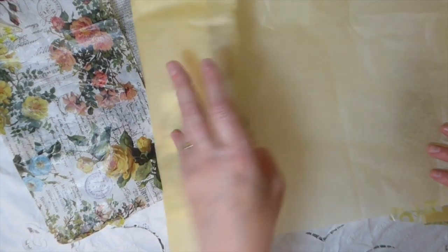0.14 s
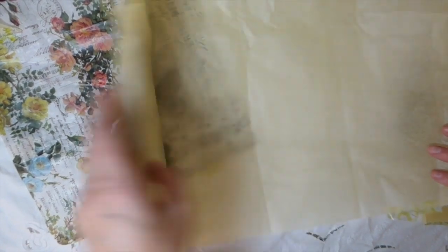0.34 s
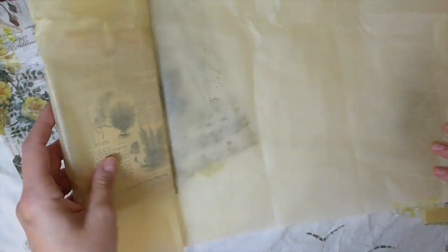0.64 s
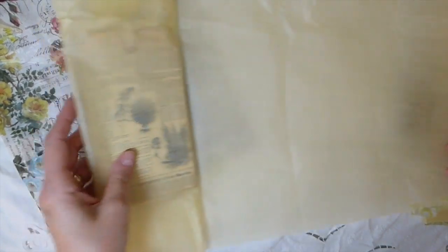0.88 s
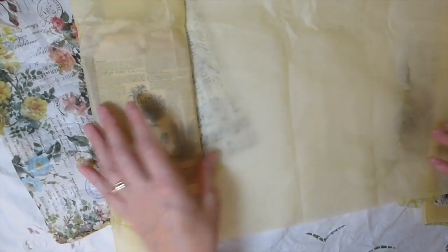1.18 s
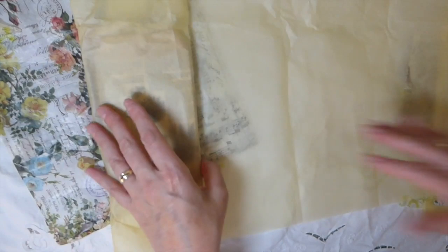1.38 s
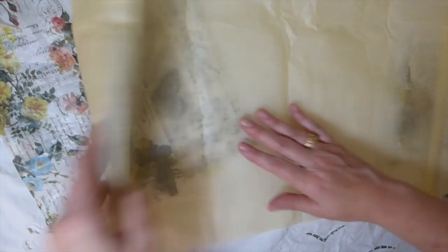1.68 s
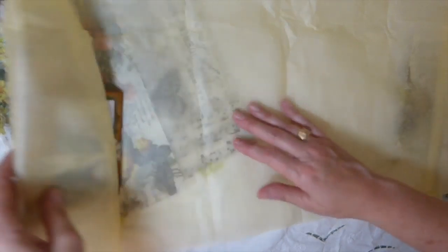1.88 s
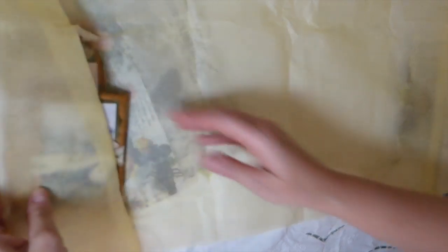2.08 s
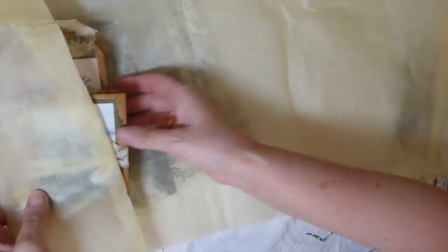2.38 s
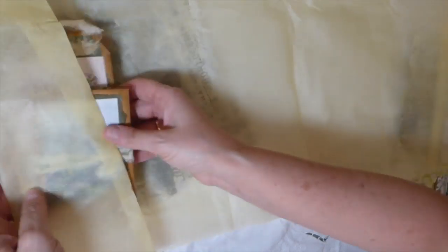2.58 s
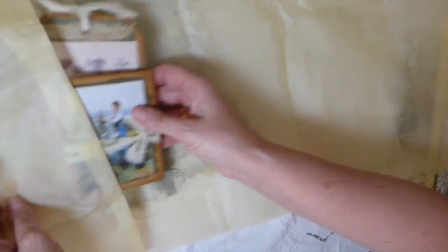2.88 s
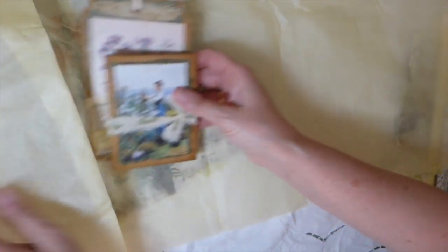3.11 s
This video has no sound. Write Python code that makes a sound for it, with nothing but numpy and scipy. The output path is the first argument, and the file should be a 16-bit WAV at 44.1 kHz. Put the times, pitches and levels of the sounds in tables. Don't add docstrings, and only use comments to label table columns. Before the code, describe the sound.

Thin tissue paper unfolds close to the microphone: separate crisp snaps first, then denser crackling as hands pull, a brief lull, and a last strong burst, in a small soft, quiet room.

```python
import sys
import numpy as np
from scipy import signal
from scipy.fft import rfft, irfft, next_fast_len
from scipy.io import wavfile
from scipy.ndimage import uniform_filter1d

SR = 44100
rng = np.random.default_rng(int(sys.argv[2]) if len(sys.argv) > 2 else 0)


def int16_out(signal):
    q = np.round(np.clip(np.atleast_2d(signal).T, -1, 1) * 32767)
    wavfile.write(sys.argv[1], SR, q.astype(np.int16))


def rack_gain(trim_db):
    fader = np.asarray(trim_db, float)
    return 10 ** (fader / 20)


N = 143325

DULL_DB = -1
LEFT_DB = 0.9
COLOUR_DB = 3.2


def unit(x):
    return x / np.sqrt(np.mean(x ** 2, axis=-1, keepdims=True) + 1e-20)


def along(points, hz):
    f, value = np.transpose(points)
    return np.interp(np.log(hz + 1), np.log(f + 1), value)


def noise(gain, shape):
    size = shape[-1]
    z = unit(irfft(rfft(rng.standard_normal(shape)) * gain, size))
    unlike = 0.22 * (1 + (np.fft.rfftfreq(size, 1 / SR) / 13000) ** 4)
    side = irfft(rfft(z[1]) * unlike, size)
    return np.array([z[0] + side, z[0] - side])


def laid(rows, s, pan_db):
    start = np.round(s * SR).astype(int)
    at = (start[:, None] + np.arange(rows.shape[-1])).ravel()
    rows = rows * rack_gain(np.array([pan_db, -pan_db]) / 2)[:, :, None]
    return np.array([np.bincount(at, r.ravel(), N + SR)[:N] for r in rows])


# start in seconds, level
# in dB, length in ms.
SNAPS_SINGLE = [(0.0428, -36, 2.5), (0.057, -30.5, 8.6), (0.083, -26, 3.5), (0.1167, -25.5, 2.5),
                (0.1574, -29, 4.8), (0.182, -26, 4), (0.1897, -41, 6), (0.2396, -28, 5.7),
                (0.266, -29.5, 8.8), (0.271, -23.5, 7.3), (0.2931, -21.5, 3.1), (0.439, -19, 6),
                (0.4554, -11.5, 1.6), (0.4958, -37, 2.5), (0.5406, -32, 1.3), (0.585, -28, 2.7),
                (0.6028, -29, 8.1), (0.646, -30, 6.3), (0.68, -24.5, 2.7), (0.6911, -21.5, 4),
                (0.7275, -32, 2.9), (0.7334, -24, 1.2), (0.7593, -30, 7.6), (0.7921, -18, 3.6),
                (0.803, -25, 5.3), (0.865, -32, 6.4), (0.8805, -47, 2.9), (0.9148, -32, 3.4),
                (0.9315, -31, 6.1), (0.9604, -30, 3.9),
                (0.978, -23.5, 4.7), (1.0081, -17.5, 3.8), (1.0635, -23.5, 7.3), (1.1358, -33, 3.2),
              (1.1434, -25, 3.2), (1.1634, -29, 6.5), (1.1828, -29.5, 5.5), (1.2148, -33.5, 3.5),
              (1.253, -39.5, 4), (1.2606, -31, 6.2), (1.2908, -37, 3.0), (1.2994, -38, 3),
              (1.319, -24.5, 5.3), (1.3507, -28.5, 17), (1.4466, -29, 5.9), (1.4598, -25, 1.9),
              (1.5052, -23, 5.2), (1.555, -21, 8), (1.6287, -21, 8.4), (1.775, -24.5, 7.7),
              (1.8472, -18.5, 3), (1.8566, -21.5, 9.5), (1.9334, -26.5, 7.7), (1.9545, -21, 3.3),
              (1.9613, -25, 2.5), (1.972, -23.5, 4.2), (1.9942, -29, 9.8), (2.038, -33, 4.9),
              (2.047, -43, 5), (2.0723, -17, 3),
                (2.0956, -29, 14), (2.1757, -32, 3.6), (2.2027, -42, 2.3), (2.2238, -27, 4.2),
               (2.247, -46, 2.1), (2.2965, -31, 4.4), (2.3054, -30.5, 11), (2.3357, -27, 20),
               (2.3582, -23, 6.9), (2.417, -23.5, 8.9), (2.441, -31, 5), (2.462, -39, 2.8),
               (2.474, -35, 5.4), (2.512, -35.5, 7.3), (2.5228, -33, 3.8), (2.5546, -28.5, 3.9),
               (2.605, -24, 2.2), (2.6112, -38, 3.7), (2.638, -29, 3.2), (2.716, -24, 3.8), (2.8, -22, 6.4),
               (2.8366, -17.5, 3.1), (2.8778, -17, 2), (2.9328, -27.5, 9.8), (2.989, -20.5, 5.4),
               (3.089, -32, 3), (3.1044, -33, 6.3), (3.1192, -18.5, 4.5), (3.1898, -34, 11),
               (3.2317, -50, 2.3)]
# start in seconds, level in dB, brightness in dB per octave.
SNAPS_BUSY = [(0.0762, -21, 1), (0.1104, -13.5, 4), (0.3476, -33, 4), (0.3565, -21, 6), (0.3662, -14.5, 8),
              (0.391, -14.5, 5), (0.5328, -21, 1), (0.573, -24.5, 0), (1.05, -14.5, -1), (1.0844, -20.5, 4),
              (1.378, -21, 4), (1.4714, -25, 4), (1.524, -23, 4), (1.5379, -18.5, 11), (1.5917, -14, 2),
              (1.6, -22, 7), (1.6555, -14, 6), (1.681, -10, 7), (1.6912, -9, 5), (1.7561, -13.5, 1),
              (1.7895, -16, 5), (1.8263, -12.5, 2.5), (1.834, -13.5, 4), (1.8751, -10, 10),
              (1.8877, -15, 12), (1.9164, -18.5, 6), (2.0106, -17, 7), (2.2728, -26, 1), (2.3935, -18, 2),
              (2.661, -34, 4), (2.6677, -24, 1), (2.7317, -11.5, 10), (2.7773, -11.5, 8.5),
              (2.8858, -8.5, 11.5), (3.0178, -18, 3), (3.046, -24, 4), (3.0501, -18.5, 4)]


def snaps():
    single = [(*row, 4.5) for row in SNAPS_SINGLE]
    busy = [(s, db - 7.5, 4.04, tilt_db) for s, db, tilt_db in SNAPS_BUSY]
    s, db, ms, tilt_db = np.transpose(single + busy)
    body_db = hands(s)[1] - 0.5
    return buckles(s, db - 9, body_db, ms, COLOUR_DB, tilt_db[:, None], size=1024)


def crackle(count):
    s = np.sort(rng.random(count)) * N / SR
    level, dull, _ = hands(s)
    size_db = 3.6 * (np.minimum(rng.exponential(size=count), 1.5) - 1)
    ms = 1.6 * np.exp(0.5 * rng.standard_normal(count))
    body_db = dull + 4.7 * rng.standard_normal(count)
    return buckles(s, level - 5 + size_db, body_db, ms, 2 * COLOUR_DB, 0, size=512)


# frequency in Hz, level in dB.
CRISP = [(300, -38), (1200, -3), (3000, 4), (16000, -4.5)]
# frequency in Hz, level in dB.
BODY = [(100, -14.5), (300, -8.5), (800, -2), (1600, -6.5), (4000, -29), (16000, -23.5)]


def buckles(s, db, body_db, ms, colour_db, tilt_db, size):
    t, hz = np.arange(size) / SR, np.fft.rfftfreq(size, 1 / SR)
    blotch = unit(uniform_filter1d(rng.standard_normal((len(s), len(hz))), size // 32, axis=1))
    gain = np.hypot(rack_gain(along(CRISP, hz)), rack_gain(along(BODY, hz) + body_db[:, None]))
    gain = gain * rack_gain(colour_db * blotch + tilt_db * np.log2(1 + hz / 4000))
    life = ms[:, None] / 1000
    rise = 1 - np.exp(-(t / 0.0005) ** 2)
    crack = rack_gain(-2) * np.exp(-(t / 0.0005) ** 2)
    burst = np.exp(-(t / life) ** 2)
    tail = rack_gain(-13) * np.exp(-t / life / 3)
    env = rise * (crack + burst + tail)
    env *= np.clip((size - np.arange(size)) / (size / 4), 0, 1)
    pan = hands(s)[2] + 4 * rng.standard_normal(len(s))
    rows = noise(gain, (2, len(s), size)) * env
    evened = np.linalg.norm(env, axis=1) / np.linalg.norm(rows.mean(0), axis=1)
    rows *= (evened * rack_gain(db))[:, None]
    return laid(rows, s, pan)


# start in seconds, peak level in dB, pitch in Hz.
POPS = [(0.059, -32.5, 1230), (0.157, -43, 1470), (0.182, -37, 1640), (0.273, -41, 1720), (0.338, -42, 894),
        (0.368, -38.5, 1210), (0.438, -23.5, 1960), (0.54, -35, 880), (0.791, -29, 860),
        (0.923, -37.5, 1230), (0.946, -31, 1340), (1.007, -34, 2130), (1.043, -29, 1340),
        (1.084, -32, 1070), (1.26, -39, 1970), (1.305, -38, 1660), (1.319, -29, 1020), (1.352, -30.5, 1190),
        (1.459, -33, 890), (1.743, -29.5, 721), (1.757, -27, 1290), (1.779, -24, 1020), (2.072, -32, 1340),
        (2.173, -41.5, 880), (2.188, -35, 1840), (2.338, -28, 765), (2.387, -27.5, 1360), (2.416, -31, 735),
        (2.474, -39, 1100), (2.511, -34.5, 910), (2.601, -30, 850), (2.647, -31.5, 920), (2.718, -37, 1390),
        (2.798, -31, 1130), (2.833, -24, 890), (2.878, -29.5, 703), (2.933, -32.5, 896),
        (2.981, -28.5, 1160), (3.018, -24.5, 1290), (3.05, -31, 1020), (3.089, -38, 1820),
        (3.119, -28.5, 1340)]
# start in seconds, peak level in dB, pitch in Hz.
FLIPS = [
    (0.369, -25.5, 4000),
    (1.007, -25, 3200),
    (1.062, -21.5, 3300),
    (1.472, -25, 1270),
    (1.504, -29, 5300),
    (1.834, -33, 2900),
    (2.665, -30, 2050),
]


def pops():
    s, db, hz = np.transpose(POPS + FLIPS)[:, :, None]
    t, f = np.arange(1024) / SR, np.fft.rfftfreq(1024, 1 / SR)
    peak = 1 / (1 + ((f / hz - hz / (f + 1)) / 0.96) ** 2)
    age = 1000 * t / 4.6
    env = 2 * age * np.exp(1 - 2 * age)
    rows = noise(peak, (2, len(s), 1024)) * env
    rows *= np.linalg.norm(env) / np.linalg.norm(rows.mean(0), axis=1, keepdims=True)
    return laid(rows * rack_gain(db - 9.5), s[:, 0], hands(s[:, 0])[2] + LEFT_DB)


def slide():
    s, hz = np.arange(N) / SR, np.fft.rfftfreq(N, 1 / SR)
    level, dull, pan = (np.interp(s, s[::32], curve) for curve in hands(s[::32]))
    skin = noise(rack_gain(along(CRISP, hz)), (2, N))
    sheet = noise(rack_gain(along(BODY, hz)), (2, N))
    hiss = skin + rack_gain(dull + DULL_DB) * sheet
    return hiss * rack_gain(level - 11 + np.array([pan, -pan]) / 2)


# centre in seconds, crackle level in dB, half width in ms, dullness in dB.
PULLS = [(0.105, -35, 16, -1.5), (0.191, -40.5, 53, -0.5), (0.292, -33.5, 13, -4), (0.376, -33, 38, -2.5),
         (0.544, -37.5, 9.4, 4.5), (0.686, -40.5, 29, 3.5), (0.795, -39.5, 22, 2.5), (1.089, -36.5, 20, -9),
         (1.324, -30.5, 10.2, -4), (1.38, -35.5, 15, -6), (1.48, -34, 14, -2.5), (1.558, -34, 7.4, -9),
         (1.604, -33, 61, -1.5), (1.684, -28, 6.6, -3), (1.782, -29.5, 23, -2), (1.838, -30, 21.5, -2),
         (1.966, -40, 5.3, 9), (2.078, -45, 70, 4), (2.291, -38.5, 19, 0), (2.395, -34.5, 16, -5),
         (2.473, -37.5, 2.5, -6), (2.61, -35, 17, -3), (2.666, -35, 15.4, -4.5), (2.742, -33, 26, -2),
         (2.833, -30, 18.4, -2.5), (2.887, -35.5, 2.8, 0), (2.989, -38, 45, 3.5), (3.126, -34.5, 24, -4)]
# time in seconds, crackle level in dB.
HANDS = [(0, -37.5), (.15, -47), (.45, -34.5), (.63, -44.5), (.8, -42.5), (0.909, -47.5), (1.098, -32),
         (1.24, -55.5), (1.45, -39.5), (1.698, -34.5), (1.95, -39.5), (2.209, -50), (2.4, -39),
         (2.56, -43.5), (2.9, -40), (3.25, -48)]


def hands(s):
    t, db = np.transpose(HANDS)
    at, pull_db, ms, pull_dull = np.transpose(PULLS)[:, :, None]
    steady = rack_gain(2 * np.interp(s, t, db))
    pulls = rack_gain(2 * pull_db) * np.exp(-(1000 * (s - at) / ms) ** 2)
    power = steady + pulls.sum(0)
    dull = (steady * DULL_DB + (pulls * pull_dull).sum(0)) / power
    return 10 * np.log10(power), dull, LEFT_DB + 0.43 * s


# frequency in Hz, time to fade by 60 dB in seconds.
ROOM = [(300, 0.38), (12000, 0.059)]


def room(x):
    hz, t, z = signal.stft(rng.standard_normal((2, SR // 2)), SR, nperseg=256)
    fading = z * rack_gain(-60 * t / along(ROOM, hz)[:, None])
    tail = signal.istft(fading, SR, nperseg=256)[1]
    late = np.pad(x, ((0, 0), (200, 0)))
    return signal.fftconvolve(late, tail / np.linalg.norm(tail[0]), axes=1)[:, :N]


# frequency in Hz, level in dB.
AIR = [(110, 1), (155, -28), (800, -13), (12000, -44)]


def air():
    hz = np.fft.rfftfreq(N, 1 / SR)
    gain = rack_gain(along(AIR, hz) - along(MIC, hz))
    return rack_gain(-53.5) * unit(irfft(rfft(rng.standard_normal((2, N))) * gain, N))


def scene():
    paper = snaps() + crackle(count=2400) + slide() + pops()
    return paper + rack_gain(-10) * room(paper) + air()


def band_limit(x):
    return signal.sosfilt(signal.butter(12, 16460, fs=SR, output="sos"), x)


# frequency in Hz, level in dB.
MIC = [(30, -29), (115, -9), (155, -2), (8200, 4), (10200, 11), (12600, -1), (15300, -11.5), (16300, -51)]


def record(dry):
    m = next_fast_len(N + 8192)
    colour = rack_gain(along(MIC, np.fft.rfftfreq(m, 1 / SR)))
    mix = irfft(rfft(dry, m) * colour, m)[:, :N]
    return band_limit(mix)


dry = scene()
out = record(dry)
int16_out(out)
```